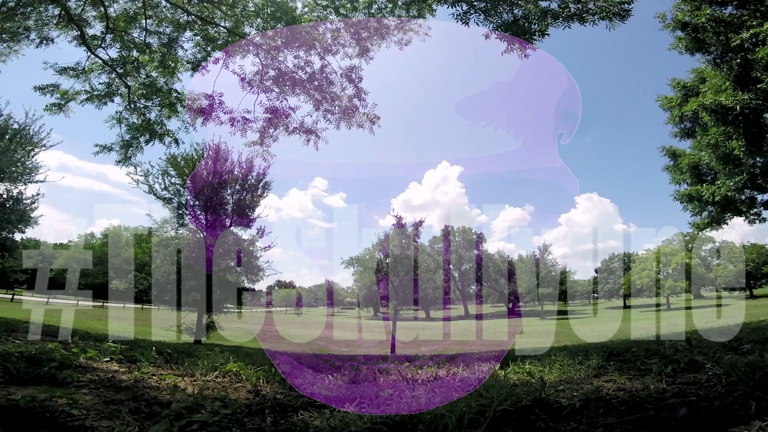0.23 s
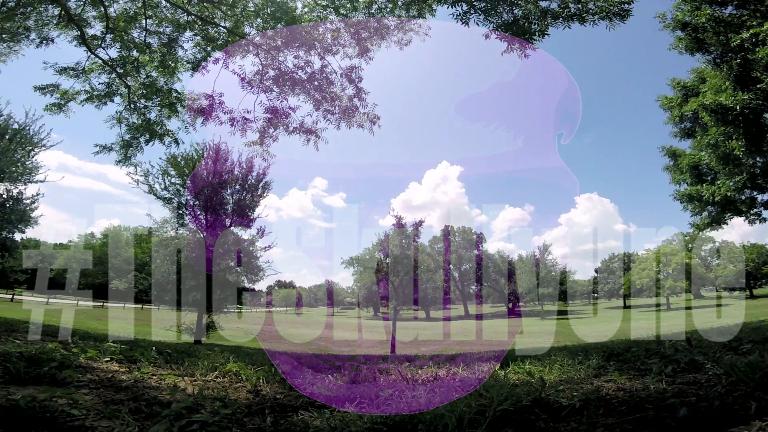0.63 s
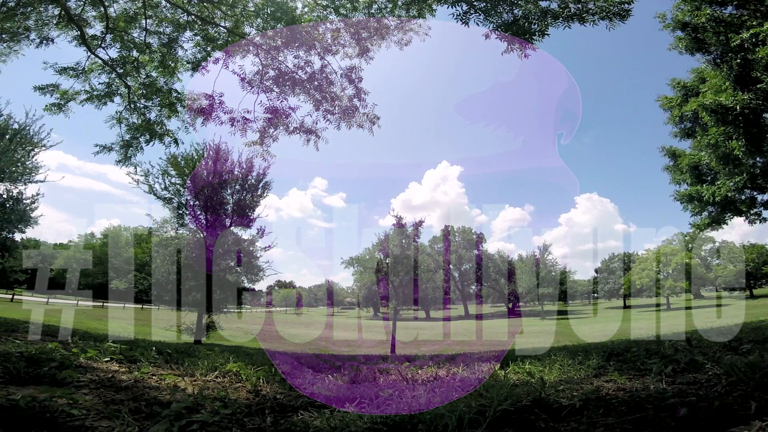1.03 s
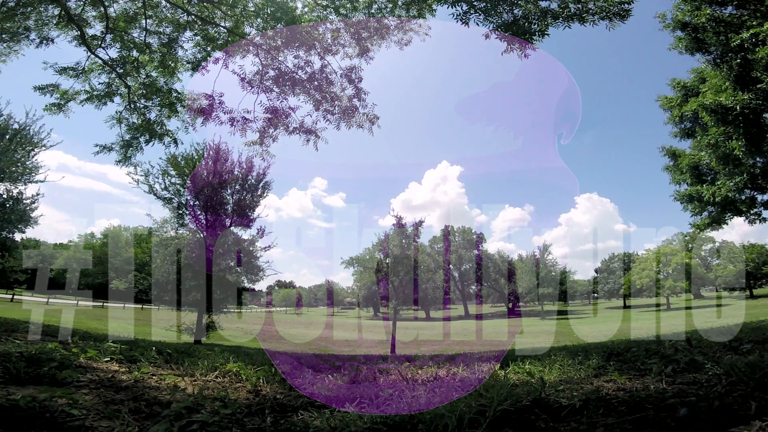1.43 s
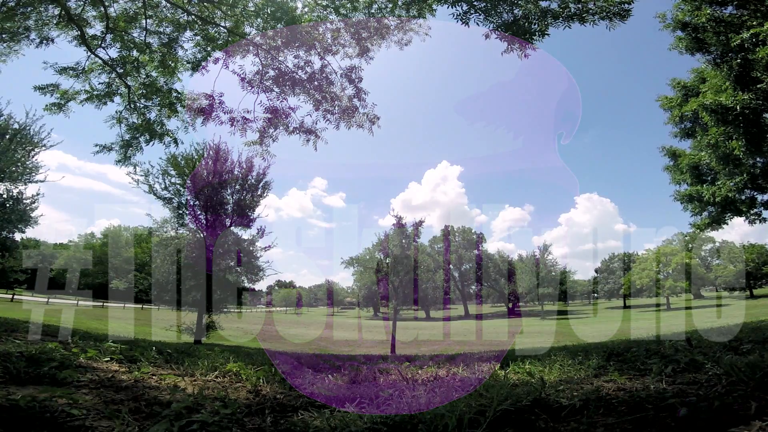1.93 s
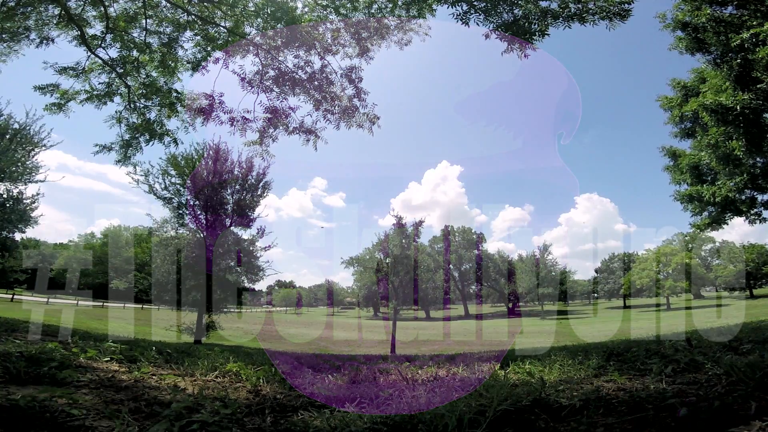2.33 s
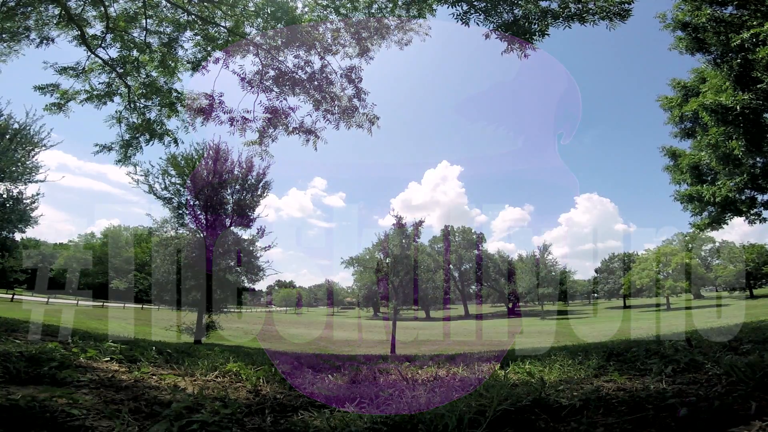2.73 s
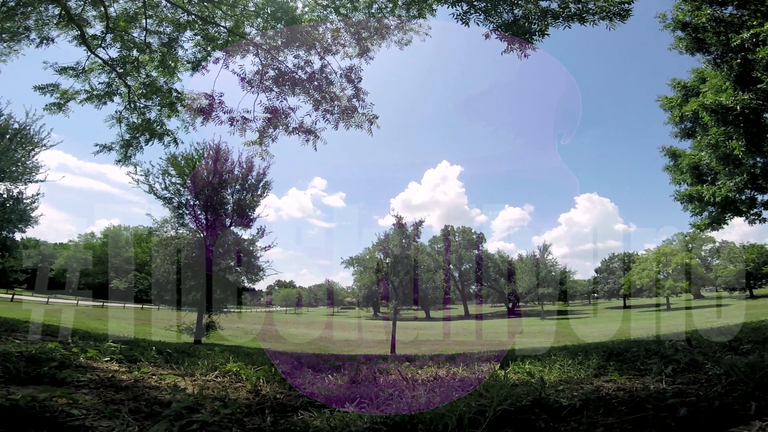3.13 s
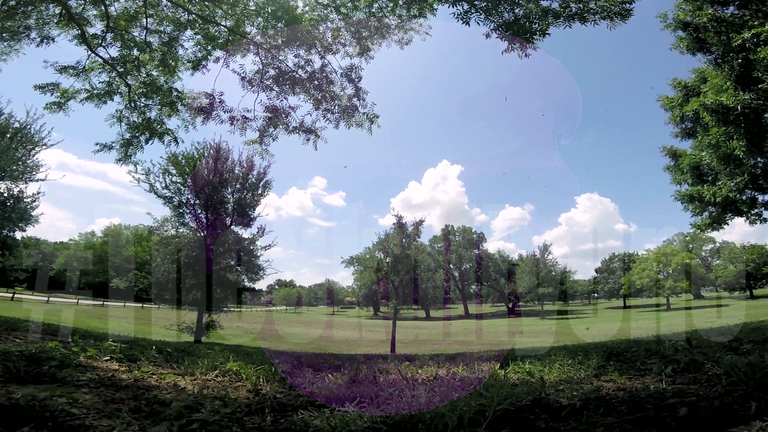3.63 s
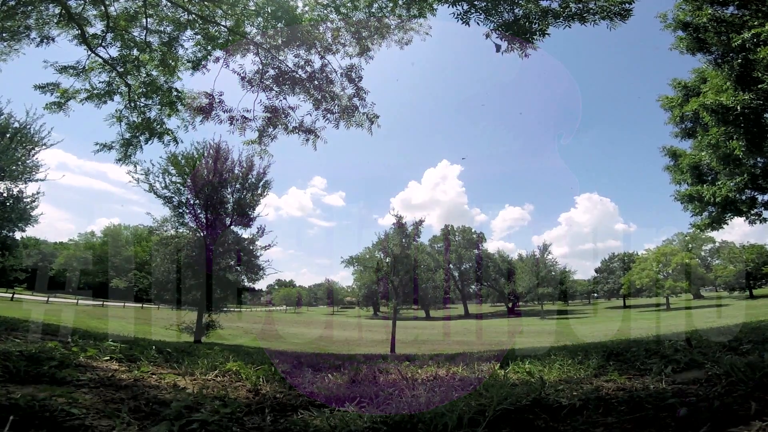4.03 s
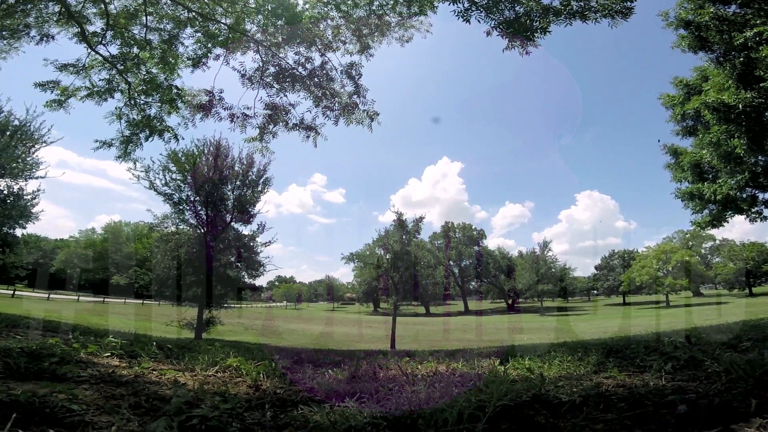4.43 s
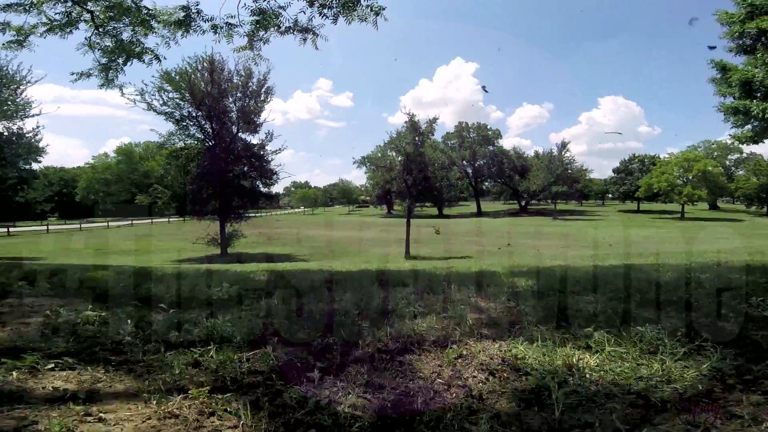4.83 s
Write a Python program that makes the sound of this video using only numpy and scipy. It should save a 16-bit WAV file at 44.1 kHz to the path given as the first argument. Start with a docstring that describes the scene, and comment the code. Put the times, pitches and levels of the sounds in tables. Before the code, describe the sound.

Quiet park with chirping birds and low breeze, then a small racing drone's motors kick in, idle, blip and climb into a rising whine.

```python
"""Racing quadcopter taking off in a park

Birds call over a low breeze, close-miked from the frame of a small racing quadcopter sitting in the grass.
Four motors kick into idle, each at its own speed, lift off with two throttle blips and then climb hard.
Three-blade propellers are sums of sines locked to each shaft angle, and blade-chopped noise is their wash.
Motor magnets whine through the frame resonances; low noise and short bursts buffet the microphone."""
import sys
import numpy as np
from scipy import signal
from scipy.fft import rfft, irfft
from scipy.io import wavfile
from scipy.ndimage import uniform_filter1d

SR = 44100
rng = np.random.default_rng(int(sys.argv[2]) if len(sys.argv) > 2 else 0)


def log_audio(samples):
    """Write samples as a 16-bit WAV file to the path given in sys.argv[1]."""
    # one column per channel
    frames = np.atleast_2d(samples).T
    # limit to full scale, then quantise
    limited = np.clip(frames, -1, 1)
    pcm = np.round(limited * 32767).astype(np.int16)
    wavfile.write(sys.argv[1], SR, pcm)


N = 224024
T = np.arange(N) / SR  # time [s]
START_S = 1.829  # the motors start
CRUISE_HZ = 125  # reference shaft speed for levels that follow speed
CLEAR_S, CLEAR_LENGTH_S = 3.714, 0.49  # the frame comes clear of the grass
CLEAR_DB = -7  # drop of the fine hiss and the high whine once clear


def undb(db):
    """Decibels to gain."""
    return 10 ** (np.asarray(db) / 20)


def unit(x):
    """Scale to rms 1."""
    return x / np.sqrt(np.mean(x ** 2))


def curves(table):
    """Each column of a timed table, sample by sample."""
    s, *columns = np.transpose(table)
    return [np.interp(T, s, c) for c in columns]


def ramp(start_s, length_s):
    """Rise from 0 to 1."""
    return np.clip((T - start_s) / length_s, 0, 1)


def swell(s, length_s):
    """A smooth bump of height 1."""
    return np.exp(-.5 * ((T - s) / length_s) ** 2)


def walk(rate):
    """Smooth random drift of rms 1, from random steps at this rate [Hz]."""
    k = max(int(SR / rate), 2)
    steps = np.repeat(rng.standard_normal(N // k + 2), k)
    smooth = uniform_filter1d(uniform_filter1d(steps, k), k)
    return unit(smooth[:N])


def noise(points):
    """Noise of rms 1 with a (frequency [Hz], level [dB]) colour, rolled off beyond both ends."""
    hz, db = np.transpose(points)
    f = np.maximum(np.fft.rfftfreq(N, 1 / SR), 1)
    ends = np.minimum(f / hz[0], 1) ** 2 * np.minimum(hz[-1] / f, 1) ** 4
    colour = undb(np.interp(np.log(f), np.log(hz), db))
    return unit(irfft(rfft(rng.standard_normal(N)) * ends * colour, N))


def resonance(hz, modes):
    """Gain of a tone: it swells as it passes a resonance and dips in a notch."""
    return 1 + sum((undb(db) - 1) / (1 + (2 * (hz - f) / width) ** 2) for f, width, db in modes)


def ringing(modes, s, db, decay_s):
    """Slightly unsteady modes that swell after a blow and die away."""
    age = np.maximum(T - s, 0) / decay_s
    ring = 0
    for hz, width, mode_db in modes:
        unsteady_hz = hz + width / 2 * walk(200)
        ring = ring + undb(mode_db) * np.sin(2 * np.pi * np.cumsum(unsteady_hz) / SR)
    return undb(db) * ring * age * np.exp(2 - 2 * age)


def park(breeze_db=-43, sway_db=.9, puff_s=0.68, puff_length_s=0.21, puff_db=2.2, hiss_db=-64):
    """A low breeze with one soft puff and distant town rumble over the microphone's own hiss."""
    # colour of the open park: (frequency [Hz], level [dB])
    park_colour = [(12, -32), (20, -12), (54, -0.5), (216, -8.5), (278, -15.5), (474, -21.5), (1020, -34.5),
                   (3300, -48.5), (3700, -54), (4160, -51), (5000, -85), (6500, -90), (11000, -120)]
    # colour of the microphone's hiss: (frequency [Hz], level [dB])
    mic_colour = [(2500, 0), (4800, -9.5), (5900, -7), (6450, 7), (7100, 1), (9000, -4), (10200, -12),
                  (11500, -9), (13000, -9)]
    db = breeze_db + puff_db * swell(puff_s, puff_length_s) + sway_db * walk(13.94)
    return noise(park_colour) * undb(db) + undb(hiss_db) * noise(mic_colour)


def birds(tail_db=-6, tail_s=.04):
    """Gliding sines with a rasp make chips, rising notes and whistles; decaying noise is the scatter off trees."""
    # a bird's quick chips: (time [s], level [dB])
    chips = [(.330, -56), (.428, -57), (.522, -59), (.614, -57), (.718, -62.5), (.827, -58)]
    # pitch through a chip: (share of its length [0-1], pitch [Hz])
    chip_shape = [(0, 3950), (.5, 4130), (.82, 4250), (.92, 3700), (1, 3150)]
    # a second bird's rising notes: (time [s], start pitch [Hz], level [dB])
    notes = [(1.491, 2850, -58.5), (1.615, 2680, -65), (1.739, 2560, -65)]
    # faint level whistles: (time [s], length [s], level [dB])
    whistles = [(0.045, 0.13, -69), (0.467, .016, -63), (0.487, .016, -62)]
    chip_s, note_s, note_rise = .023, 0.024, 1.25  # rise: end pitch over start pitch
    whistle_hz = 3200
    rasp = 1 + .024 * walk(700)

    def call(s, length, shape, db, late=1):
        """One note that glides through its shape; the larger late is, the later it peaks."""
        u = ramp(s, length)
        hz = np.interp(u, *np.transpose(shape)) * rasp
        envelope = 2 * np.sqrt(u ** late * (1 - u ** late))
        return undb(db) * envelope * np.sin(2 * np.pi * np.cumsum(hz) / SR)

    out = sum(call(s, chip_s, chip_shape, db, late=2.6) for s, db in chips)
    out = out + sum(call(s, note_s, [(0, hz), (1, hz * note_rise)], db) for s, hz, db in notes)
    out = out + sum(call(s, length, [(0, whistle_hz), (1, whistle_hz)], db) for s, length, db in whistles)
    trees = rng.standard_normal(SR // 2) * np.exp(-T[:SR // 2] / tail_s)
    scattered = signal.fftconvolve(out, trees / np.linalg.norm(trees))[:N]
    return out + undb(tail_db) * scattered


def buffeting(clear_db=-2, draught_db=-29.5, swirl_db=1.5):
    """Downwash rumbles on the microphone, less once clear of the grass; single eddies slap it."""
    # colour of the downwash rumble: (frequency [Hz], level [dB])
    rumble = [(15, -12), (30, -5.5), (65, -2), (110, -21), (200, -7.5), (400, -20.5), (1000, -52)]
    # gusts that slap the microphone: (time [s], length [s], level [dB], upper edge [Hz])
    gusts = [(1.85, 0.02, -30, 80), (2.043, 0.017, -31, 90), (2.32, .04, -28, 90.3),
             (2.861, 0.041, -25.5, 80), (3.093, 0.029, -27.5, 600), (3.212, 0.015, -14.5, 97.9),
             (3.44, 0.028, -27, 158.5), (3.624, 0.014, -25, 200), (3.72, 0.013, -17.5, 79.7),
             (3.869, 0.021, -19.5, 119.5), (4.193, 0.013, -22, 99), (4.592, .025, -21.5, 199),
             (4.687, 0.019, -27, 500), (4.835, 0.022, -17.5, 109.8), (4.887, 0.011, -22, 596.7),
             (5.047, 0.01, -20.5, 151)]
    db = draught_db + clear_db * ramp(CLEAR_S, CLEAR_LENGTH_S) + swirl_db * walk(22.4)
    out = noise(rumble) * undb(db)
    for s, length, gust_db, edge_hz in gusts:
        eddy = noise([(30, 0), (edge_hz, -3), (edge_hz * 3, -20), (edge_hz * 12, -42)])
        out = out + eddy * undb(gust_db) * swell(s, length)
    return out


def bumps():
    """Growing light, the drone rocks against the ground and the camera housing knocks: short ringing modes."""
    # bumps just before lift-off: (time [s], level [dB], decay [s])
    knocks = [(3.124, -26, 0.013), (3.431, -35, .02), (3.475, -34, 0.015)]
    # what a bump rings with: (frequency [Hz], width [Hz], level [dB])
    modes = [(340, 50.4, 8.5), (647, 50, 0), (1034, 36.7, -3)]
    return sum(ringing(modes, s, db, decay) for s, db, decay in knocks)


def jolts():
    """Each torque kick of a starting motor ticks as a noise burst and sets the frame ringing."""
    # starting kicks: (time [s], ring level [dB], tick level [dB], ring decay [s])
    kicks = [(1.831, -38.5, -36, .015), (1.879, -37, -27, .013), (1.905, -35, -55, .022),
             (2.027, -30.5, -55, .022)]
    # what a kick rings with: (frequency [Hz], width [Hz], level [dB])
    modes = [(350, 60, 0), (520, 90, -6), (720, 50, 2), (1620, 60, -11), (2440, 25, 0)]
    out = 0
    for s, ring_db, tick_db, decay in kicks:
        age = np.maximum(T - s, 0)
        tick = noise([(200, 13.0), (2500, -16), (7000, -9.0), (12000, -46)])
        tick = tick * (1 - np.exp(-age / 0.00067)) * np.exp(-age / 0.013)
        out = out + ringing(modes, s, ring_db, decay) + undb(tick_db) * tick
    return out


def running(rise_s):
    """Silence until the motors start, then a rise to 1."""
    return ramp(START_S, rise_s)


def spin(shaft_hz, hunt=0.00301, flutter=0.003):
    """Shaft angle [rad]: the summed speed, which wanders slowly and flutters quickly by small shares."""
    hz = uniform_filter1d(shaft_hz, size=700) * (1 + hunt * walk(25) + flutter * walk(220))
    return 2 * np.pi * (np.cumsum(hz) / SR + rng.random())


def load(shaft_hz):
    """Load on the blades, from -1 (slowing down hard) to 1 (speeding up hard)."""
    load_scale = 3.35  # octaves per second at which the load reaches 0.76
    octaves_per_s = uniform_filter1d(np.gradient(np.log2(shaft_hz)) * SR, size=2500)
    return np.tanh(octaves_per_s / load_scale)


def imbalance(angle, shaft_hz, hum_db, sway_db=2.0):
    """A propeller slightly out of balance hums once a turn, loudest at the resonances of the mount."""
    # resonances of the camera mount: (frequency [Hz], width [Hz], lift [dB])
    mount = [(62.4, 4.6, 8.5), (140.4, 12.5, 25), (198, 24, 19)]
    return undb(hum_db + sway_db * walk(16)) * resonance(shaft_hz, mount) * np.sin(angle)


def motor(angle, shaft_hz, rattle_db, spin_up_db, magnet_dbs, flicker_db=2.2):
    """The shaft rattles and 14 magnets tug at the stator; the frame passes little of their top treble."""
    # shaft rattle before each rotor's trim: (multiple of the shaft rate, level [dB])
    rattle = [(2, -44.5), (4, -51.5), (5, -52), (6, -44), (9, -48), (10, -53.5), (11, -50), (12, -47.5),
              (18, -49.5), (30, -55)]
    # strain, easing around lift-off: (time [s], magnet torque trim [dB], rattle trim [dB])
    strain = [(1.85, 0, -8), (1.95, 0, -7), (2.05, 1, -2), (2.15, 1, -1), (3.0, 1, -1), (3.35, -2, -2),
              (3.55, -8, -10)]
    # frame resonances and one notch: (frequency [Hz], width [Hz], lift [dB])
    frame = [(355, 56, 13), (540, 90, -5), (650, 65, 10), (882, 120, 7), (1224, 56, 6.5), (1900, 65, 11.5),
             (2430, 210, 13), (4150, 200, 7), (6230, 350, 15)]
    torque_db, loose_db = curves(strain)
    torque_db = torque_db + spin_up_db * swell(1.94, .055)
    # the upper magnet tones only ring out once the motor has settled
    settled_db = np.interp(T, [1.98, 2.1], [-16, 0])
    partials = [(np.round(k), db + rattle_db + loose_db) for k, db in rattle]
    for k, db in zip((14, 28, 42, 84), magnet_dbs):
        partials.append((k, db + torque_db + settled_db * (k > 14)))
    out = 0
    for order, db in partials:
        hz = order * shaft_hz
        gain = undb(db + flicker_db * walk(19)) * resonance(hz, frame) / (1 + (hz / 6000) ** 10)
        out = out + gain * np.sin(order * angle + 2 * np.pi * rng.random())
    return out


def high_whine(angle, shaft_hz):
    """Thin electric overtones of the lead motor, heard only while they slide through a narrow treble band."""
    low_hz, high_hz = 4750, 6600
    whine_db, load_db = -48.3, 1.5  # swells as the shaft speeds up
    out = 0
    for order in (49, 63):  # multiples of the shaft rate
        hz = order * shaft_hz
        out = out + np.sin(order * angle) / (1 + (low_hz / hz) ** 70 + (hz / high_hz) ** 30)
    db = whine_db + load_db * load(shaft_hz) + CLEAR_DB * ramp(CLEAR_S, CLEAR_LENGTH_S)
    return out * undb(db + 2 * walk(39.56))


def wash(angles, speed, bite_db, chop=0.17, flicker_db=1.1, sway_db=.6):
    """Blade-tip turbulence in three noise bands follows speed and load and pulses as each blade sweeps by."""
    # noise colours, low to high: (frequency [Hz], level [dB])
    rush_colour = [(120, 11.5), (220, 5.5), (350, -5), (520, 2.5), (800, 2.5), (1300, -5.5), (2000, -4),
                   (2800, -10), (4500, -45)]
    hiss_colour = [(1200, -3.5), (2200, -2), (2900, -0.5), (4100, -1.5), (4700, -11), (5600, -16.5),
                   (7000, -29)]
    fine_colour = [(4500, -15), (5950, -10), (6400, 1.5), (6850, -7.5), (7900, -12), (9000, -26),
                   (10200, -33), (11200, -19.5), (11900, -34.5), (12500, -65)]
    build_db, fizz_db = -6, 2.5  # rush and hiss build up to idle while the fine treble fizzes
    load_rush_db, load_hiss_db = 3.5, 1  # extra level at full load
    hiss_full_hz = 154  # the hiss follows speed no further above this shaft rate
    octaves, loaded = np.log2(speed / CRUISE_HZ), load(speed)
    hiss_octaves = np.minimum(octaves, np.log2(hiss_full_hz / CRUISE_HZ))
    starting = 1 - ramp(1.876, 0.16)
    # with speed the rush eases slightly, while hiss and fine treble grow
    rush_db = -33 - 1.3 * octaves + load_rush_db * loaded + build_db * starting
    hiss_db = -32 + 8 * hiss_octaves + load_hiss_db * loaded + build_db * starting
    fine_db = -38.5 + 5 * octaves + load_hiss_db * loaded + fizz_db * starting
    fine_db = fine_db + CLEAR_DB * ramp(CLEAR_S, CLEAR_LENGTH_S)
    air = 0
    for colour, db in [(rush_colour, rush_db), (hiss_colour, hiss_db), (fine_colour, fine_db)]:
        air = air + noise(colour) * undb(db + flicker_db * walk(70))
    sweeps = sum(np.cos(3 * a) for a in angles) / 2 * undb(bite_db)
    spun_up = undb(np.interp(T, [1.876, 1.886], [-17, 0]))
    return air * unit(1 + chop * sweeps) * spun_up * undb(sway_db * walk(8.3))


def blade_tones(speeds, sway_db=2):
    """Blade tone levels [dB]: the lead is timed; the rest follow pitch and load, sway and flutter."""
    # the lead rotor's dominant tone, before its trim: (time [s], level [dB])
    lead_tone = [(2.0, -55), (2.08, -17), (3.0, -15.5), (3.24, -23), (3.36, -20), (3.51, -25),
                 (3.555, -9.5), (3.6, -20), (3.77, -10.5), (3.83, -26), (3.9, -15.5), (4.0, -17.5),
                 (4.06, -47), (4.13, -12.5), (4.25, -25), (4.33, -14), (4.42, -23), (4.53, -9.5),
                 (4.61, -25.5), (4.9, -28.5), (5.06, -13)]
    # tone of the other rotors by its pitch, before trims: (pitch [Hz], level [dB])
    tone_by_pitch = [(110, -38), (172, -24), (181, -24), (205, -39), (240, -25), (290, -26), (360, -16.5),
                     (440, -18.5), (520, -22.5), (640, -23.5)]
    load_db, flutter_db = 3, 4  # extra level and flutter at full load
    hz, db = np.transpose(tone_by_pitch)
    levels = []
    for speed in speeds[1:]:
        loaded_db = load(speed) * (load_db + flutter_db * walk(130))
        levels.append(np.interp(3 * speed, hz, db) + sway_db * walk(12) + loaded_db)
    second, third, fourth = levels
    # the third rotor's tone swells at spin-up
    return curves(lead_tone)[0], second, third + 25 * swell(1.865, 0.068), fourth


def propeller(angle, shaft_hz, tone_db, buzz_db, speed_db=4.0, flicker_db=2.5, rough=0.24, scatter=0.75,
              ring_hz=830, ring_db=4):
    """Three blades: a strong passing tone and pulse-like overtones that grow with every doubling of speed."""
    # buzz at cruising speed, before each rotor's trim: (multiple of the shaft rate, level [dB])
    buzz_levels = [(6, -40.5), (9, -43), (12, -45.5), (15, -45), (18, -46.5), (24, -49), (36, -54),
                   (60, -58)]
    tone = undb(tone_db + .8 * walk(60)) * np.sin(3 * angle)
    orders, dbs = np.transpose(buzz_levels)
    buzz = 0
    for k in range(6, 40, 3):
        hz = k * shaft_hz
        db = np.interp(k, orders, dbs) + flicker_db * walk(30)
        # the frame lifts overtones near ring_hz, and the camera housing dulls the highest
        db = db + ring_db / (1 + ((hz - ring_hz) / 130) ** 2)
        dulled = undb(db) / (1 + (hz / 4300) ** 12)
        buzz = buzz - dulled * np.cos(k * angle + scatter * rng.standard_normal())
    growth = undb(buzz_db + speed_db * np.log2(shaft_hz / CRUISE_HZ))
    # the faster the blades, the more they stall in bursts and the raspier the buzz
    rasp = 1 + rough * (shaft_hz / CRUISE_HZ) * walk(400)
    return tone + buzz * growth * rasp


def scene():
    """Four rotors beat against each other above the quiet park; their speeds drive the drone's steady layers."""
    # shaft speed of the lead rotor: (time [s], shaft rate [Hz])
    lead = [(1.83, 30), (1.89, 37), (1.925, 45), (1.98, 57.5), (2.03, 62.5), (2.08, 63.8), (2.7, 63.8),
            (2.98, 64.8), (3.02, 68), (3.06, 75.4), (3.1, 79), (3.14, 77), (3.22, 70.5), (3.3, 74.8),
            (3.37, 80.5), (3.42, 81), (3.445, 97), (3.5, 115), (3.55, 134), (3.63, 143), (3.67, 137),
            (3.715, 121.5), (3.77, 131), (3.815, 151), (3.845, 150), (3.91, 119.5), (3.99, 116.5),
            (4.09, 118), (4.18, 112.3), (4.3, 115), (4.42, 113.5), (4.54, 137), (4.61, 179), (4.68, 200),
            (4.77, 217), (4.82, 215), (4.88, 221), (4.96, 216), (5.08, 219.5)]
    # shaft speeds of the other three: (time [s], shaft rate [Hz])
    second = [(1.831, 33), (1.92, 46.98), (2.039, 59.16), (2.2, 59.57), (3.42, 59.41), (3.62, 81.07),
              (3.72, 73), (3.83, 82.92), (3.95, 69.93), (4.22, 65.7), (4.421, 67), (4.57, 83.87),
              (4.62, 110), (4.72, 158.5), (4.78, 182.9), (4.831, 196.8), (4.89, 202.4), (4.949, 199),
              (5.08, 215.5)]
    third = [(1.83, 68), (1.89, 70.6), (1.95, 78.6), (2.03, 69.15), (2.998, 68.4), (3.12, 74.66),
             (3.25, 68.85), (3.6, 84.22), (3.72, 75), (3.829, 85.5), (4.001, 73.3), (4.42, 74),
             (4.559, 83.73), (4.63, 104.1), (4.68, 120), (4.72, 140), (4.779, 174.8), (4.88, 200),
             (4.96, 202), (5.08, 211)]
    fourth = [(1.83, 37.05), (2.05, 74.17), (2.998, 74.17), (3.121, 81.67), (3.249, 74.15), (3.4, 81.54),
              (3.62, 139), (3.722, 120), (3.83, 143.4), (3.92, 117), (4.2, 111.9), (4.4, 117),
              (4.531, 164.5), (4.62, 178), (4.68, 188.9), (4.79, 215.5), (5.08, 219)]
    # one row a rotor: (blade tone trim [dB], imbalance hum away from the mount's resonances [dB])
    trims = [(-0.5, -42.5), (-0.5, -39.5), (-4.5, -47.5), (-5, -55.5)]
    # one row a rotor: (blade buzz trim [dB], rattle trim [dB], extra magnet level at spin-up [dB],
    # then magnet whine before strain and frame at 14, 28, 42 and 84 times the shaft rate [dB each])
    shares = [(7, 1.5, 10.5, -42, -55, -57, -62), (5.5, -2.5, -10, -44.5, -48.5, -50.5, -65),
              (-3, -2.5, -4, -53.5, -51, -72, -72), (-5, -4, -8, -46.5, -60, -58, -60)]
    load_buzz_db = 3.5  # extra buzz at full load, from cruising speed up
    speeds = [curves(table)[0] for table in (lead, second, third, fourth)]
    angles = [spin(hz) for hz in speeds]
    speed = np.sqrt(np.mean(np.square(speeds), axis=0))
    # the blades bite harder with every doubling of the rotors' speed
    bite_db = -2 + 3.5 * np.log2(speed / CRUISE_HZ)
    drone = wash(angles, speed, bite_db) + buffeting() + high_whine(angles[0], speeds[0])
    for hz, angle, tone_db, trim, share in zip(speeds, angles, blade_tones(speeds), trims, shares):
        trim_db, hum_db = trim
        buzz_db, rattle_db, spin_up_db, *magnet_dbs = share
        loaded_db = load_buzz_db * load(hz) * np.minimum(hz / CRUISE_HZ, 1) ** 2
        drone = drone + propeller(angle, hz, tone_db + trim_db, buzz_db + bite_db + loaded_db)
        drone = drone + imbalance(angle, hz, hum_db)
        drone = drone + running(0.071) * motor(angle, hz, rattle_db, spin_up_db, magnet_dbs)
    return (drone * running(0.0084) + jolts() + bumps() + birds() + park())[None]


def record(dry):
    """The camera cuts the top treble: a steep low-pass at 13.1 kHz."""
    return signal.sosfilt(signal.ellip(8, .2, 80, 13100, fs=SR, output="sos"), dry)


dry = scene()
out = record(dry)
log_audio(out)
```